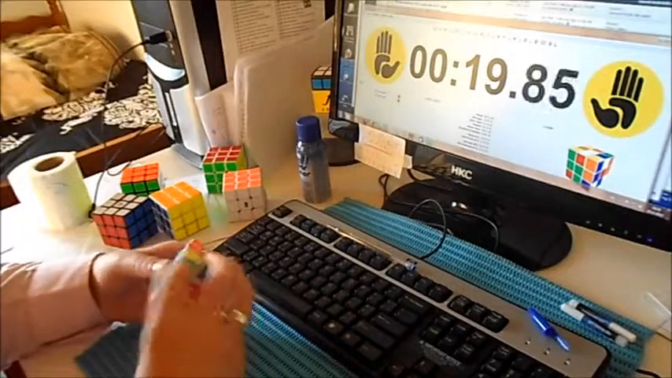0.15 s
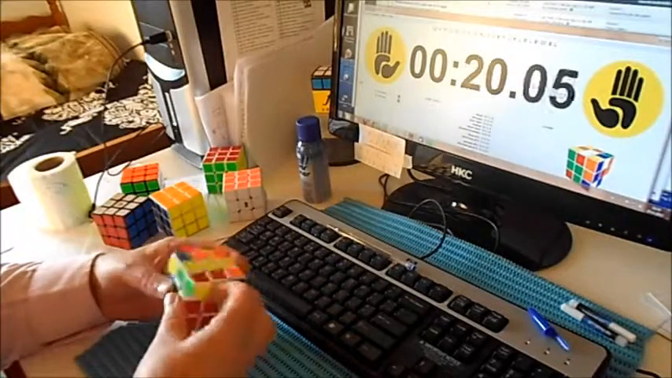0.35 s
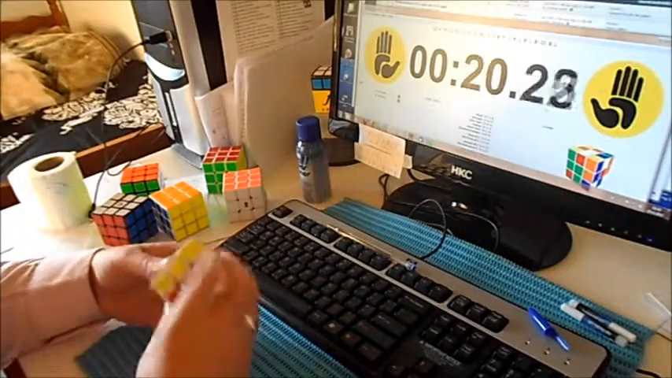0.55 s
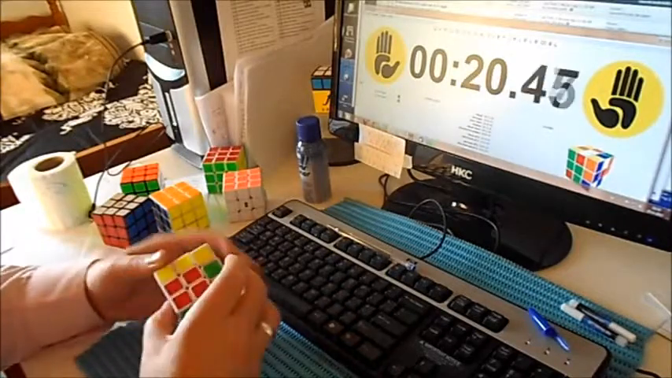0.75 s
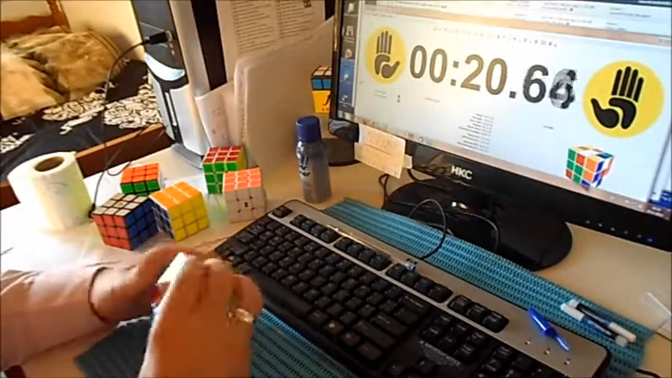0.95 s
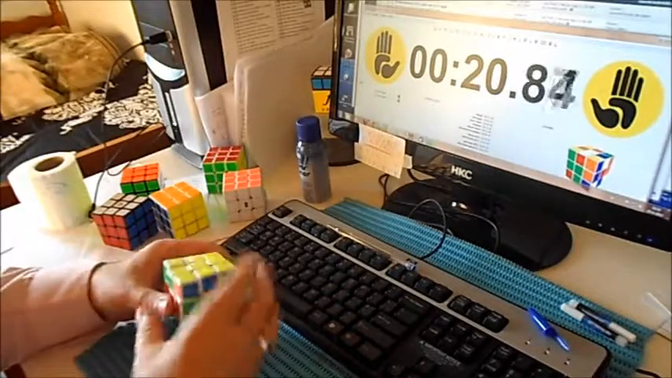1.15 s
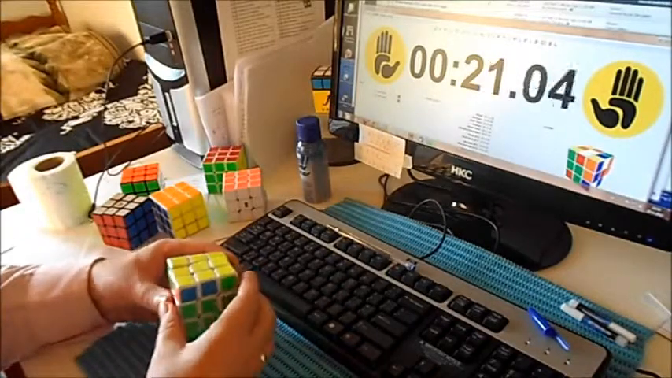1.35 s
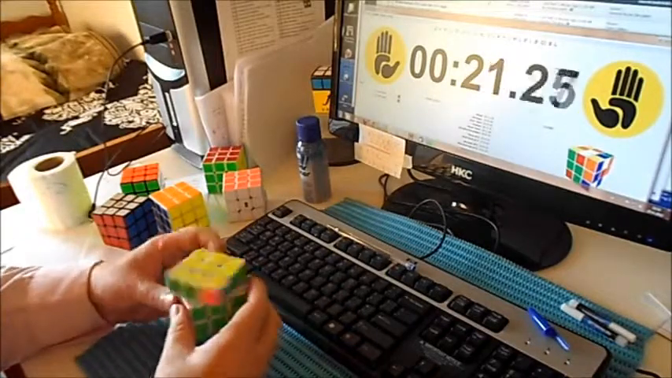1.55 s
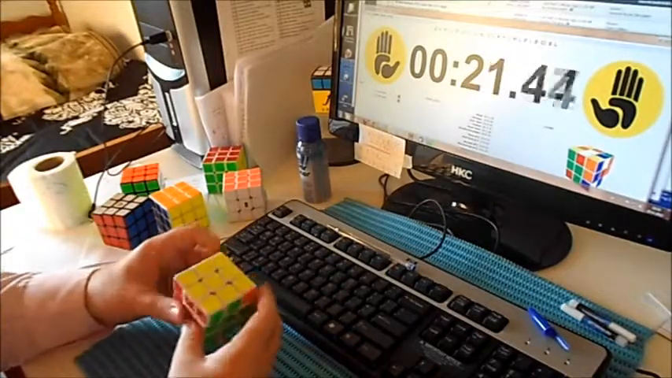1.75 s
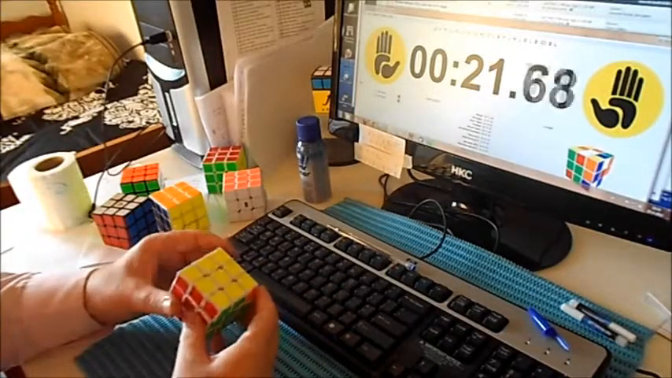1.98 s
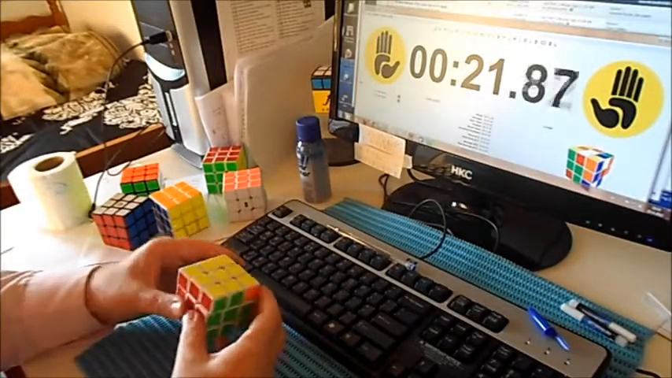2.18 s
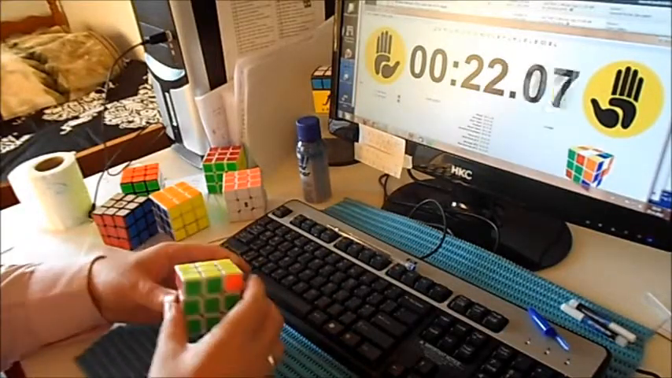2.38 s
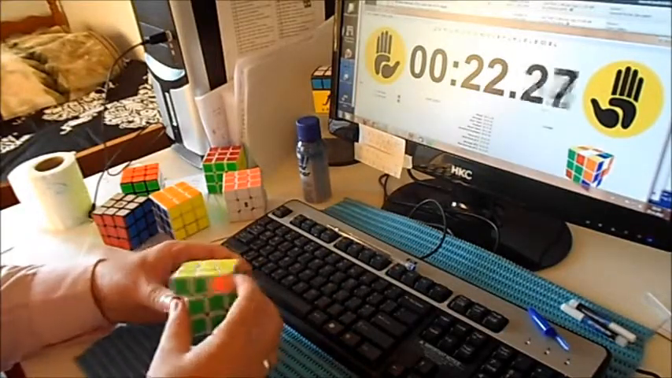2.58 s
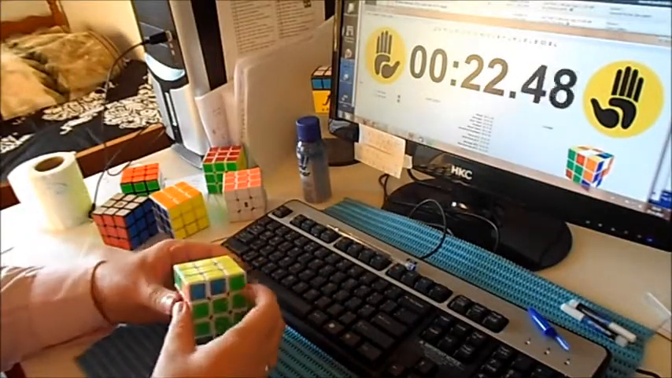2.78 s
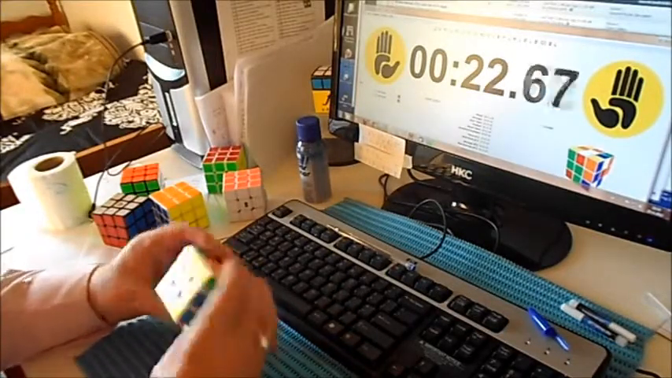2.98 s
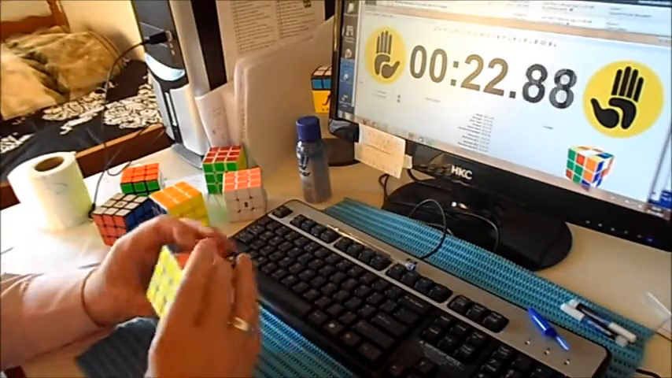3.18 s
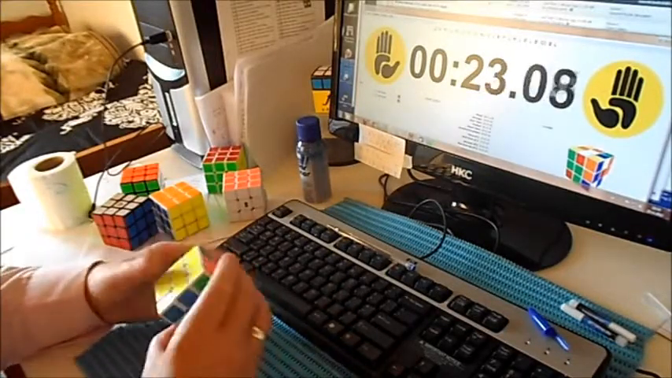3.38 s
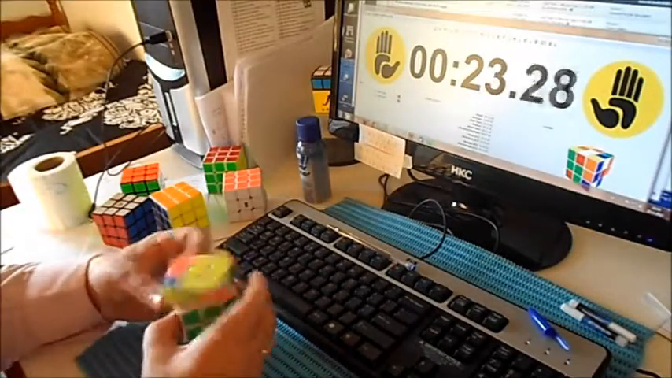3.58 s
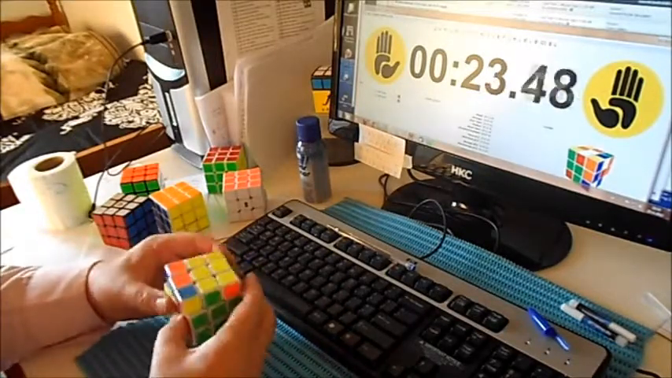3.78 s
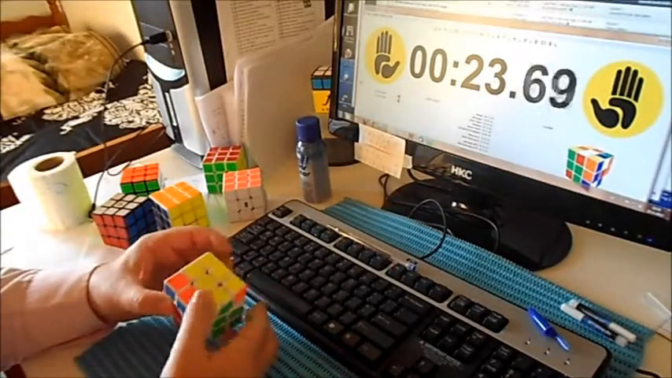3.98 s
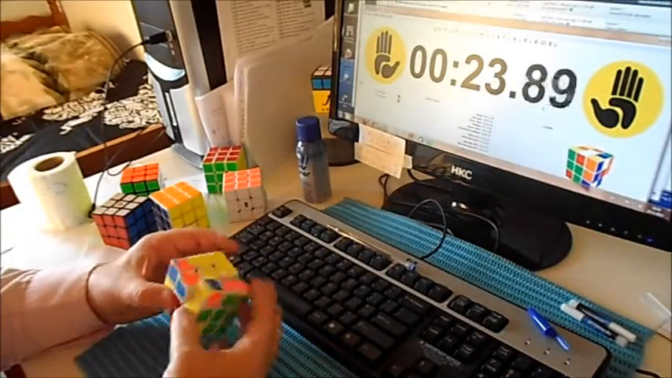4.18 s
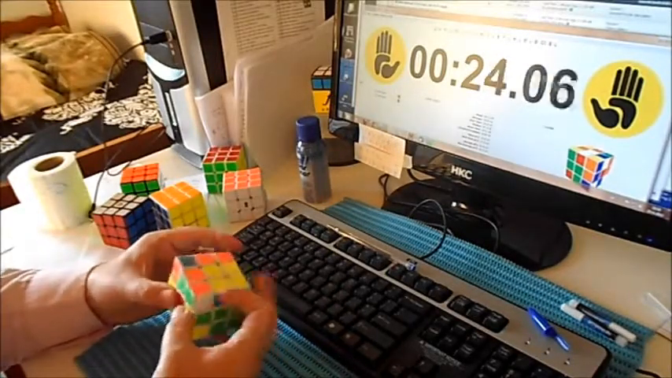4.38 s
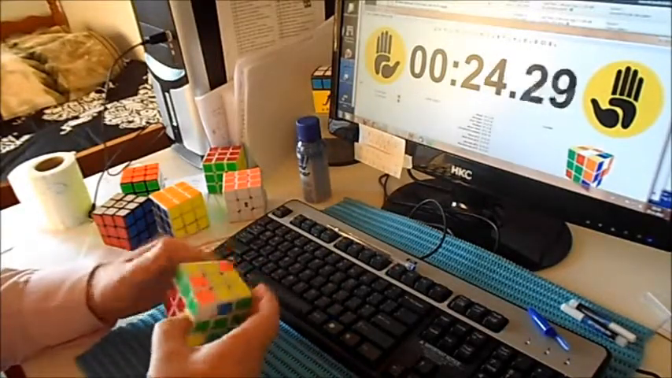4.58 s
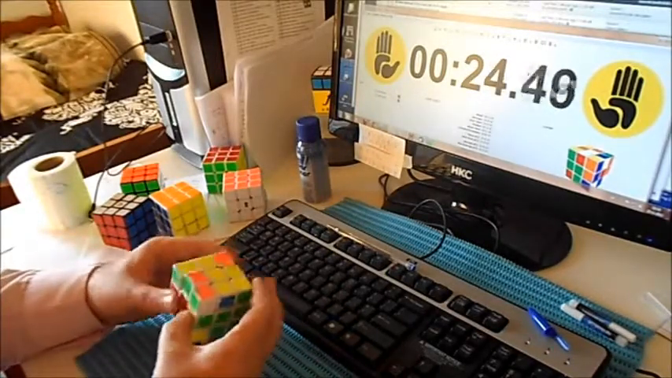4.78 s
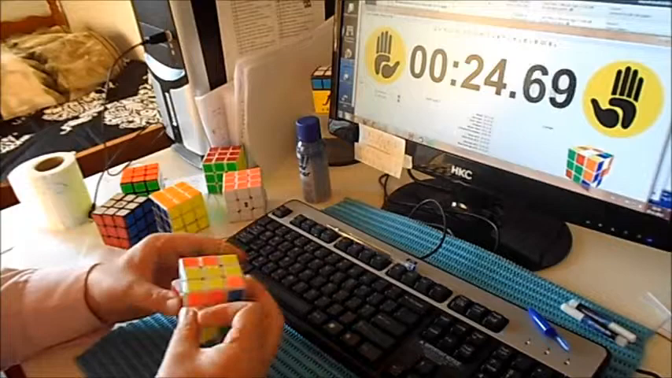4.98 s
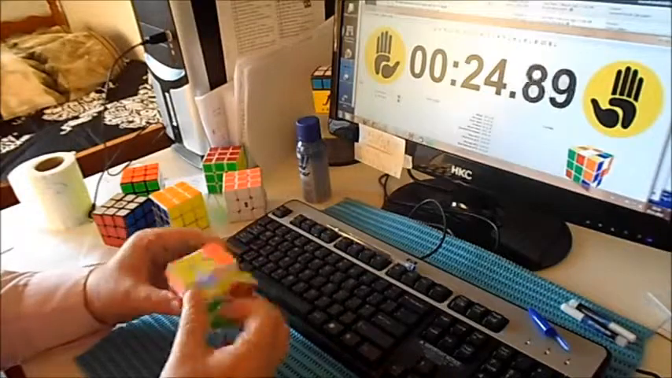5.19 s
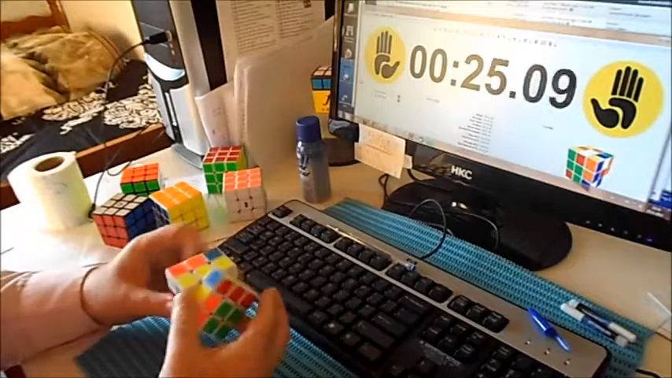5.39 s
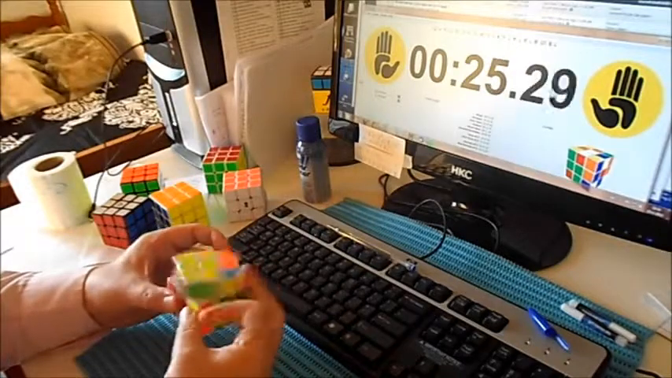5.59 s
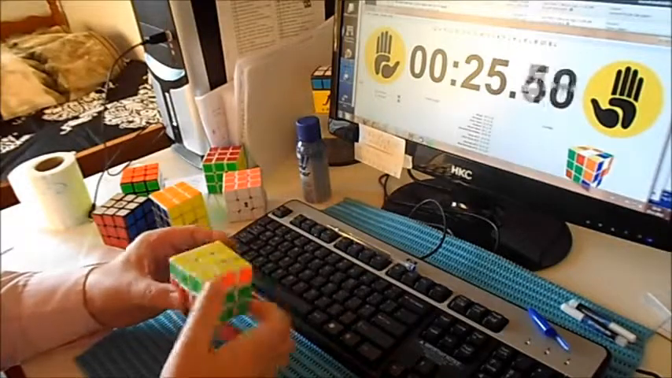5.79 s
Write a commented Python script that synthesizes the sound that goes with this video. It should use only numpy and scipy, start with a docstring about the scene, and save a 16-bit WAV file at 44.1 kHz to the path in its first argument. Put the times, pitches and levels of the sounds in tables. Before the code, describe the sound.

Quick plastic clicks and rattling snaps come from a puzzle cube being turned above a desk, near the microphone in a small room. After a first busy run, the turns become isolated, leaving a quiet hum, hiss and faint thin whistles audible. Then the clacking picks up again, denser and a little louder, with light rubbing as the layers slide and catch, continuing to the end.

```python
"""Speed cube turned by hand

A plastic cube is turned quickly in two hands above a desk in a small room. In each turn the
pieces slide, catch and snap into line, ringing their thin shells and the hollow core.
A low hum, soft hiss and faint high tones fill the pauses; gain control ducks after loud snaps."""
import sys
import numpy as np
from scipy import signal
from scipy.fft import rfft, irfft
from scipy.io import wavfile
from scipy.ndimage import uniform_filter1d, minimum_filter1d

SR = 44100
rng = np.random.default_rng(int(sys.argv[2]) if len(sys.argv) > 2 else 0)


def generate_wav(signal):
    """Clip the signal to [-1, 1] and save it as 16-bit WAV at the path in sys.argv[1]."""
    frames = np.transpose(np.atleast_2d(signal))
    scaled = np.clip(frames, -1, 1) * 32767
    pcm = np.round(scaled).astype(np.int16)
    wavfile.write(sys.argv[1], SR, pcm)


N = 257975
TIME = np.arange(N) / SR

# thin shells of the pieces: (frequency [Hz], width [Hz], gain [dB])
SHELL_MODES = [(1463, 490, -8.5), (1888, 137, -4), (2290, 470, -7), (3088, 310, 0), (3700, 655, -1.5),
               (4705, 750, 0.5), (5510, 810, 0.5), (6460, 730, -1), (7500, 1450, -3.5), (8880, 1740, -6),
               (9734, 720, -10)]
# hollow cube in cupped hands: (frequency [Hz], width [Hz], gain [dB])
CORE_MODES = [(430, 120, -14), (553, 70, -3), (665, 100, -1.5), (750, 110, -2), (838, 85, 1),
              (1070, 120, -4)]
# turns of a layer: (start [s], end [s], final friction level [dB])
LAYER_TURNS = [(0.03, 0.117, -30), (0.242, 0.284, -24), (0.349, 0.425, -26), (0.466, 0.624, -29.5),
               (0.866, 0.975, -33), (1.607, 1.704, -29.5), (2.652, 2.705, -35.5), (3.523, 3.644, -32.5),
               (3.628, 3.688, -16.5), (3.86, 3.955, -37.5), (4.003, 4.16, -38), (4.165, 4.25, -24.5),
               (4.27, 4.383, -27.5), (4.52, 4.65, -35.5), (4.896, 5.065, -30), (5.129, 5.168, -22),
               (5.229, 5.362, -28.5), (5.593, 5.761, -26.5)]


def from_db(db):
    return 10 ** (np.asarray(db) / 20)


def unit_rms(x, first_s=None):
    """Scale to rms 1, taken over all of x or over its onset."""
    part = x if first_s is None else x[:int(first_s * SR)]
    return x / np.sqrt(np.mean(part ** 2) + 1e-20)


def in_time(rows):
    """Each column of a time curve at every sample."""
    times_s, *columns = np.transpose(rows)
    return [np.interp(TIME, times_s, column) for column in columns]


def at_hz(rows, hz):
    """Interpolate on a log-frequency axis."""
    points_hz, values = np.transpose(rows)
    return np.interp(np.log(hz + 1e-9), np.log(points_hz), values)


def butter(x, hz, kind, order=2):
    return signal.sosfilt(signal.butter(order, hz, kind, fs=SR, output="sos"), x)


def resonate(x, hz, width_hz):
    """Two-pole resonance, peak gain 1."""
    r = np.exp(-np.pi * width_hz / SR)
    feedback = [1, -2 * r * np.cos(2 * np.pi * hz / SR), r * r]
    return signal.lfilter(np.array([1, 0, -1]) * (1 - r * r) / 2, feedback, x + 1e-18)


def waver(cutoff_hz):
    """Slow noise, rms 1."""
    return unit_rms(butter(rng.standard_normal(N), cutoff_hz, "low"))


def tone(hz):
    """Sine along a pitch curve, rms 1."""
    return np.sqrt(2) * np.sin(2 * np.pi * np.cumsum(hz) / SR)


def room_tone(hum_db, murmur_db, drone_db, hum_hz=50.3, waver_hz=0.84):
    """Hum, faint drones and a murmur of air swell and sink together under a soft hiss."""
    # air noise spectrum: (frequency [Hz], relative density [dB])
    air_spectrum = [(47, -39), (80, -1.5), (106, -1.5), (213, -5.5), (250, -0.5), (589, -11), (867, -10.5),
                    (1060, -11.5), (2770, -14), (10400, -16.5), (13500, -103), (22000, -120)]
    # steady resonances: (frequency [Hz], width [Hz], relative level [dB])
    drone_modes = [(256, 26, 0), (339, 14, -2), (540, 40, -12), (885, 60, -16)]
    # base level of hum, murmur and drones: (time [s], level [dB])
    low_levels = [(0.0, -37.5), (0.45, -39), (0.75, -42.5), (0.92, -38), (1.08, -41.5), (1.2, -39),
                  (1.38, -39.5), (1.46, -41), (2.1, -42), (2.3, -43.5), (3.35, -42), (3.62, -36),
                  (3.85, -41), (4.28, -30), (4.55, -41), (4.92, -37), (5.15, -42.5), (5.85, -41)]
    # hiss bands: (time [s], middle [dB], treble [dB])
    hiss_levels = [(0.0, -48.5, -47), (1.15, -50, -53.5), (1.55, -51, -56.5), (1.95, -49, -55),
                   (2.25, -53.5, -59.5), (2.65, -51, -56), (2.95, -54, -53), (3.45, -49.5, -52),
                   (4.7, -48, -55), (5.8, -52.5, -50.5)]
    low_db, = in_time(low_levels)
    middle_db, treble_db = in_time(hiss_levels)
    hum = tone(hum_hz + waver_hz * waver(cutoff_hz=2.2))
    bins_hz = np.arange(N // 2 + 1) * SR / N
    air = irfft(rfft(rng.standard_normal(N)) * from_db(at_hz(air_spectrum, bins_hz)), N)
    murmur = unit_rms(butter(air, 770, "low", order=4))
    drones = unit_rms(sum(from_db(db) * unit_rms(resonate(rng.standard_normal(N), hz, width_hz))
                          for hz, width_hz, db in drone_modes))
    low = from_db(hum_db) * hum + from_db(murmur_db) * murmur + from_db(drone_db) * drones
    hiss = butter(air, 620, "high", order=4)
    middle = unit_rms(butter(hiss, 4800, "low", order=3))
    treble = unit_rms(butter(hiss, 4500, "high", order=3))
    return from_db(low_db) * low + from_db(middle_db) * middle + from_db(treble_db) * treble


def whine(hz, waver_hz):
    """A faint, slightly unsteady high tone that comes up after a while."""
    # swell of the whine: (time [s], level [dB])
    levels = [(1.5, -80), (1.9, -61), (3.0, -62.5), (3.5, -59.5), (5.8, -72)]
    level_db, = in_time(levels)
    return from_db(level_db) * tone(hz + waver_hz * waver(cutoff_hz=35))


def whistles(waver_hz):
    """Thin whistles swell, glide unsteadily and fade."""
    # whistles: (start [s], length [s], first pitch [Hz], last pitch [Hz], level [dB])
    glides = [(1.76, 0.15, 9000, 8950, -60), (1.96, 0.07, 9400, 9350, -60), (1.96, 0.06, 4950, 4950, -56),
              (2.04, 0.16, 10250, 9650, -56), (2.35, 0.15, 9700, 10600, -61),
              (2.53, 0.11, 10400, 9300, -60)]
    out = np.zeros(N)
    drift_hz = waver_hz * waver(cutoff_hz=40)
    for start_s, length_s, first_hz, last_hz, db in glides:
        on = (TIME > start_s) & (TIME < start_s + length_s)
        progress = (TIME[on] - start_s) / length_s
        hz = first_hz + (last_hz - first_hz) * progress + drift_hz[on]
        swell = np.sqrt(np.abs(np.sin(np.pi * progress)))
        out[on] += from_db(db) * swell * tone(hz)
    return out


def room_echo(gap_s, bands=8, samples=11000):
    """Desk and screen reflect within milliseconds; the echoes thicken and die, treble first."""
    # room decay: (frequency [Hz], T60 [s])
    decay_times = [(400, 0.14), (1000, 0.15), (3000, 0.15), (6000, 0.12), (10000, 0.12)]
    age_s = np.maximum(np.arange(samples) / SR - gap_s, 0)
    density = np.minimum(.1 + age_s / .03, 1)
    echoes = rng.standard_normal(samples) * (age_s > 0)
    echoes *= (rng.random(samples) < density) / np.sqrt(density)
    edges_hz = np.geomspace(250, 14000, bands + 1)
    tail = 0
    for low_hz, high_hz in zip(edges_hz, edges_hz[1:]):
        t60_s = at_hz(decay_times, np.sqrt(low_hz * high_hz))
        tail += butter(echoes, [low_hz, high_hz], "band") * from_db(-60 * age_s / t60_s)
    return tail / np.sqrt(np.sum(tail ** 2))


def room(x, gap_s, wet_db, poses=10, pose_samples=800):
    """The cube moves in the hands, so successive stretches of sound meet different echoes."""
    pose = np.arange(N) // pose_samples % poses
    wet = sum(signal.oaconvolve(x * (pose == k), room_echo(gap_s))[:N] for k in range(poses))
    return x + from_db(wet_db) * wet


def ring(force, modes, tilt_db=0):
    """A force rings the modes; pieces differ, so gains and pitches scatter."""
    out = 0
    slope_db = tilt_db * np.linspace(-.5, .5, len(modes))
    for k, (hz, width_hz, db) in enumerate(modes):
        louder, higher = rng.standard_normal(2)
        gain = from_db(db + slope_db[k] + 1.5 * louder)
        out += (-1) ** k * gain * resonate(force, hz + .2 * width_hz * higher, width_hz)
    return out


def friction_db(time_s, start_s, end_s, end_db, rise_db=4):
    """Friction rises as a layer gathers speed."""
    return end_db - rise_db * (end_s - time_s) / (end_s - start_s)


def sliding(slips_per_s, shell_db, core_db):
    """Plastic rubs on plastic in tiny slips that excite shells and core."""
    friction = np.zeros(N)
    for start_s, end_s, end_db in LAYER_TURNS:
        on = (TIME > start_s) & (TIME < end_s)
        friction[on] += from_db(friction_db(TIME[on], start_s, end_s, end_db))
    slip_db = 4 * np.minimum(rng.exponential(1, N), 3.5)
    slips = from_db(slip_db) * rng.choice([-1, 1], N)
    slips *= rng.random(N) < slips_per_s / SR
    shell = unit_rms(ring(slips, SHELL_MODES))
    core = unit_rms(ring(slips, CORE_MODES))
    return uniform_filter1d(friction, size=300) * (from_db(shell_db) * shell + from_db(core_db) * core)


def corner_ticks(knock_db, rattle_db, ticks_per_s=26, above_friction_db=0.5, scatter_db=5, count=12):
    """Contact rows for corners brushing past at random in each turn; levels follow the friction."""
    rows = []
    for start_s, end_s, end_db in LAYER_TURNS:
        times_s = start_s + np.cumsum(rng.uniform(.3, 1.7, count)) / ticks_per_s
        levels_db = friction_db(times_s, start_s, end_s, end_db) + above_friction_db
        levels_db += scatter_db * rng.standard_normal(count)
        rows += [(s, db, knock_db, rattle_db) for s, db in zip(times_s, levels_db) if s < end_s]
    return rows


def chatter(rattle_db, strike_s=0.0029, settle_s=0.012, volley_per_s=7000, rattle_per_s=3500):
    """Contact force: a tight volley of touches, then loose neighbours rattle to rest."""
    samples = 3000
    age_s = np.arange(samples) / SR
    volley = (rng.random(samples) < volley_per_s / SR) * np.exp(-(age_s / strike_s) ** 2)
    rattle = (rng.random(samples) < rattle_per_s / SR) * np.exp(-age_s / settle_s)
    force = (volley + from_db(rattle_db) * rattle) * rng.uniform(-1.15, 1, samples)
    force[0] = .8   # first touch
    return force


def contact(db, knock_db, rattle_db, firm_db=-17, firm_tilt_db=5, tilt_per_db=0.54, scatter_db=1):
    """The shells snap, brighter when hit harder; the core adds a longer, hollow knock."""
    force = chatter(rattle_db)
    tilt_db = firm_tilt_db + tilt_per_db * (db - firm_db) + scatter_db * rng.standard_normal()
    snap = unit_rms(ring(force, SHELL_MODES, tilt_db), first_s=.003)
    knock = unit_rms(ring(force, CORE_MODES, tilt_db=1.5), first_s=.008)
    return from_db(db) * (snap + from_db(knock_db) * knock)


def clacks():
    """Pieces catch and snap into line, among lighter ticks of the corners."""
    # contacts: (time [s], snap level [dB], knock re snap [dB], rattle re volley [dB])
    snaps = [(0.0567, -34.5, -10, -1), (0.0737, -24, -31, 19), (0.082, -12, -20, 23), (0.097, -13, -11, 8),
             (0.1045, -7.5, -8, -13), (0.12, -8.5, -36, -4), (0.2018, -28, -13, 6), (0.233, -28, -11, -1),
             (0.2461, -14.5, -12.5, -11), (0.2577, -22.5, -12, 3), (0.2771, -15.5, -19, -4.5),
             (0.3056, -22.5, -13, -0.5), (0.3505, -24, -26, -10), (0.3589, -23, -13, 6),
             (0.365, -16, -16, -9), (0.3902, -11, -18.5, -25), (0.394, -16, -23, -14),
             (0.4513, -23.5, -19, -4), (0.4655, -19, -12.5, -3), (0.534, -22.5, -11, 3),
             (0.553, -19, -24, -13), (0.572, -21, -30, -17), (0.601, -22, -6.5, -2),
             (0.6078, -7.5, -21.5, 7), (0.867, -30.5, -10.5, 7), (0.9092, -19, -13, -2.5),
             (0.9447, -10, -17.5, 16), (1.091, -34.5, -12, 1), (1.5877, -12.5, -17, 6),
             (1.5976, -17, -16, -33), (1.638, -18.5, -28, -1), (1.6578, -19.5, -26, -12),
             (1.6796, -18, -13.5, 4), (1.6927, -7.5, -26, -5.5), (1.774, -37, -20, -6),
             (2.2375, -47, -10, -6), (2.274, -43.5, -10, -18), (2.6455, -30.5, -18, 17),
             (2.6658, -27.5, -24, -16), (2.6926, -21, -14.5, 1), (2.7097, -15, -15, -5),
             (3.1944, -42, -15, -3), (3.288, -40.5, -10, 11), (3.5456, -21, -10, -14),
             (3.5495, -18.5, -12.5, -23), (3.602, -15.5, -16, 4), (3.6345, -11, -19, 20),
             (3.657, -4.5, -17, 1.5), (3.738, -29.5, -17, 7), (3.8851, -34, -14, -12),
             (3.9087, -28.5, -18, -16), (3.9491, -20.5, -14.5, 24), (4.131, -25.5, -8.5, -3),
             (4.1777, -21, -11, 0), (4.2122, -25, -6.5, -21), (4.2312, -19.5, -15, -4),
             (4.265, -12.5, -20.5, -13), (4.329, -24, -15, 9), (4.333, -4, -24, -6),
             (4.3649, -6.5, -17.5, 9), (4.3726, -11, -7.5, -19), (4.3894, -15, -16, -10),
             (4.402, -21, -23, -9), (4.4887, -31.5, -22, -10), (4.5188, -26.5, -12, -11),
             (4.5656, -10.5, -17.5, 2), (4.5983, -14, -26, 4), (4.6033, -23, -11, 1),
             (4.622, -14.5, -16, -18), (4.6365, -16.5, -16, -2), (4.7996, -26.5, -15, -11),
             (4.9033, -20.5, -18, -14), (4.9253, -12, -22, -14), (4.9999, -27, -4.5, -9),
             (5.0183, -4.5, -19.5, -33), (5.0214, -11, -13, 2), (5.0482, -12, -23, -10),
             (5.1374, -17.5, -28, -4), (5.147, -17, -18, -4), (5.1597, -15, -22, 7.5),
             (5.2311, -25.5, -16, -6), (5.2711, -19.5, -11.5, -2), (5.2762, -12.5, -15, -30),
             (5.2936, -42, -9, -1), (5.3162, -20, -8, -20), (5.3205, -5.5, -16, -6.5),
             (5.375, -22, -13.5, 5), (5.416, -18.5, -16.5, -2), (5.4423, -20, -21, -21),
             (5.5819, -22.5, -13, -13), (5.5858, -14, -20, 6), (5.6139, -7, -20, -22),
             (5.6445, -13.5, -19, -21), (5.6547, -8.5, -23, 0), (5.6816, -9, -16.5, -7),
             (5.6952, -15, -25, -5), (5.7059, -5, -20, -6.5), (5.7542, -14.5, -24, -13),
             (5.8264, -26, -13, 0)]
    out = np.zeros(N + SR)
    for time_s, db, knock_db, rattle_db in list(snaps) + corner_ticks(knock_db=-9, rattle_db=-13):
        sound = contact(db, knock_db, rattle_db)
        start = round(time_s * SR)
        out[start:start + len(sound)] += sound
    return out[:N]


def gain_control(x, threshold_db=-28.5, slope=0.31, attack_s=0.015, hold_s=0.094, release_db_per_s=53):
    """Loud moments turn the gain down; it holds briefly, then recovers."""
    level_db = 10 * np.log10(np.abs(uniform_filter1d(x ** 2, size=220)) + 1e-12)
    cut_db = slope * np.maximum(level_db - threshold_db, 0)
    half_hold = int(hold_s * SR / 2)
    held_db = -minimum_filter1d(-cut_db, 2 * half_hold + 1, origin=half_hold, mode="constant")
    ramp_db = release_db_per_s * TIME
    released_db = np.maximum.accumulate(held_db + ramp_db, axis=-1) - ramp_db
    pole = np.exp(-1 / (attack_s * SR))
    return x * from_db(-signal.lfilter([1 - pole], [1, -pole], released_db))


def scene():
    """The cube and its echoes over the background, mono."""
    background = room_tone(hum_db=0.4, murmur_db=-10, drone_db=-12)
    background += whine(hz=2770, waver_hz=12.8) + whistles(waver_hz=80)
    cube = sliding(slips_per_s=1600, shell_db=-3, core_db=-13) + clacks()
    return (room(cube, gap_s=.003, wet_db=-8) + background)[None]


def record(dry):
    """Gain control, soft clipping, steep low-pass."""
    ceiling, cutoff_hz = .8, 10550
    rounded = ceiling * np.tanh(gain_control(dry) / ceiling)
    return signal.sosfilt(signal.cheby1(12, .3, cutoff_hz, fs=SR, output="sos"), rounded)


dry = scene()
out = record(dry)
generate_wav(out)
```